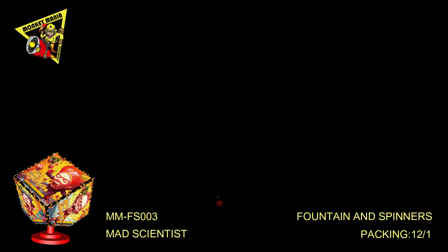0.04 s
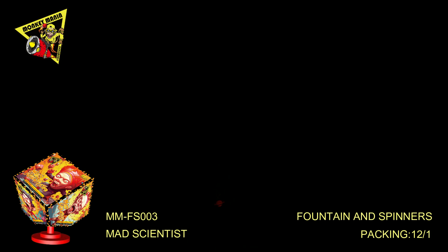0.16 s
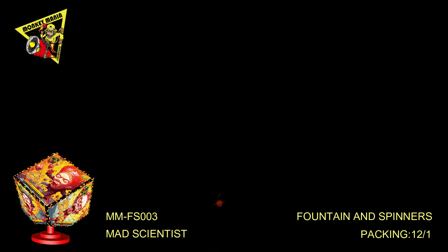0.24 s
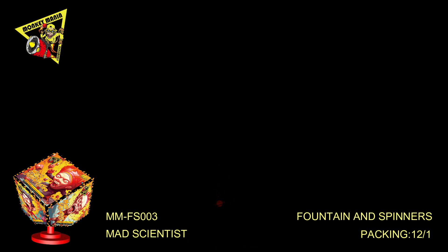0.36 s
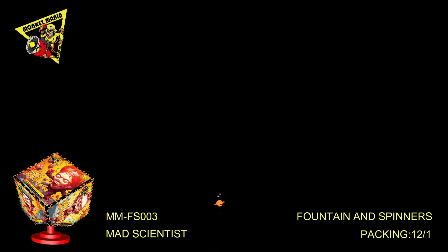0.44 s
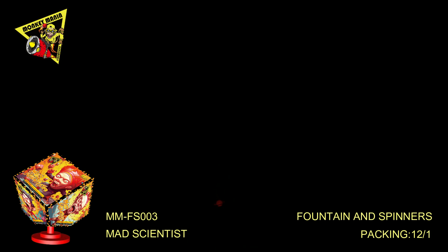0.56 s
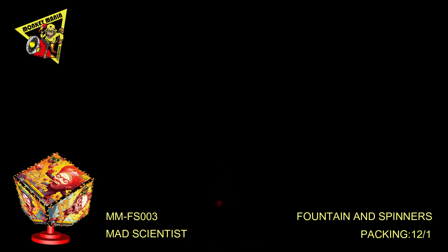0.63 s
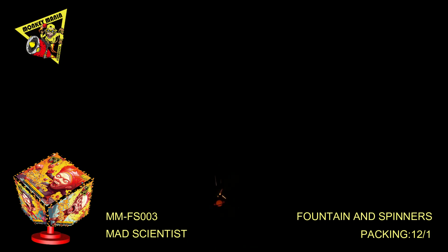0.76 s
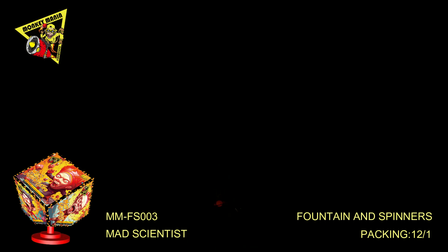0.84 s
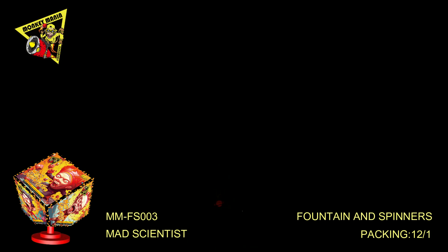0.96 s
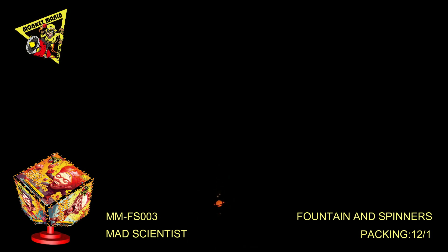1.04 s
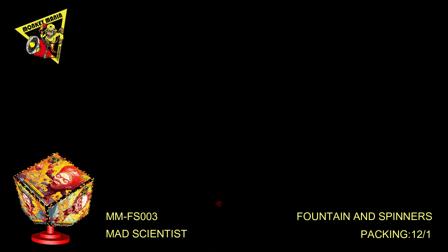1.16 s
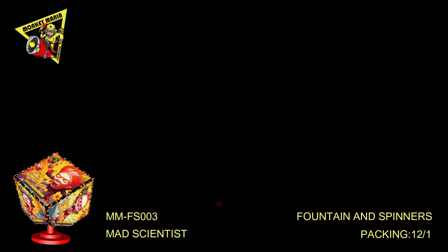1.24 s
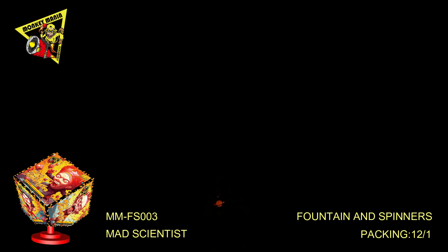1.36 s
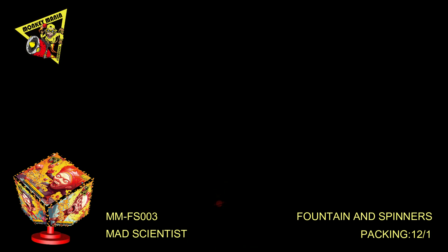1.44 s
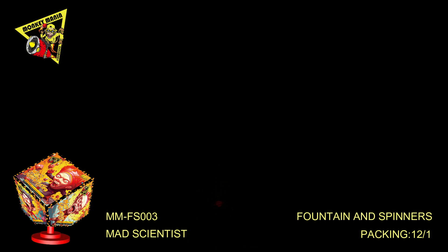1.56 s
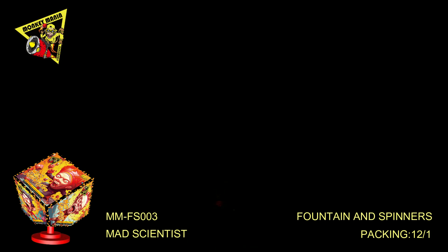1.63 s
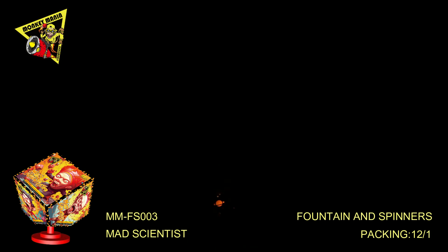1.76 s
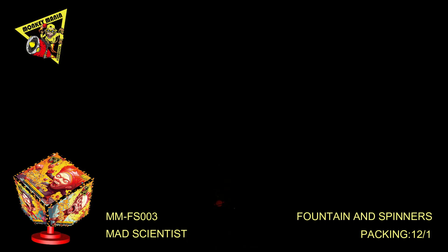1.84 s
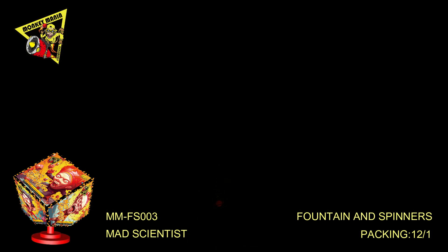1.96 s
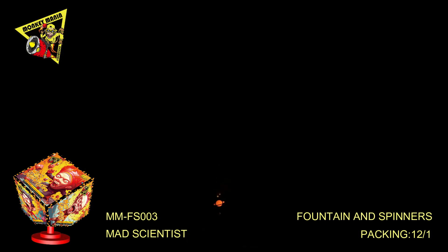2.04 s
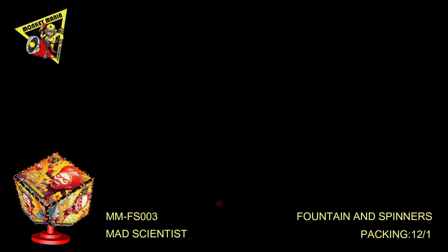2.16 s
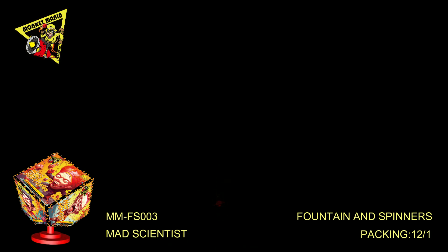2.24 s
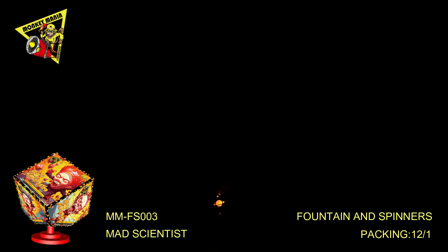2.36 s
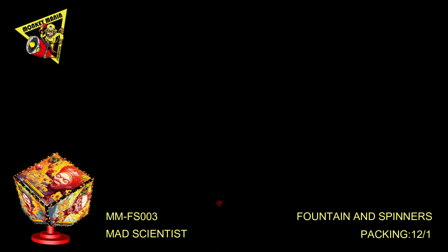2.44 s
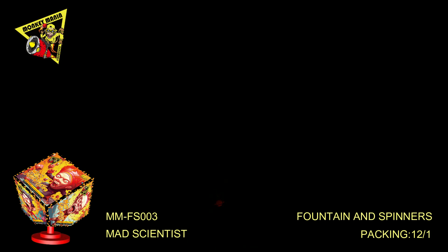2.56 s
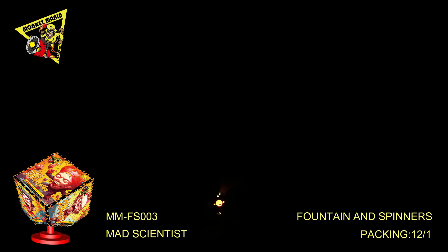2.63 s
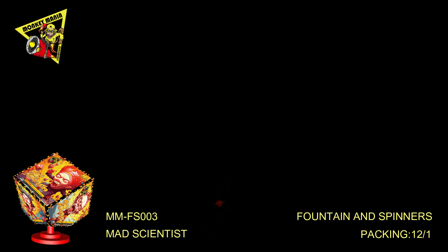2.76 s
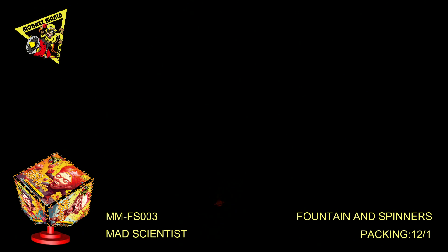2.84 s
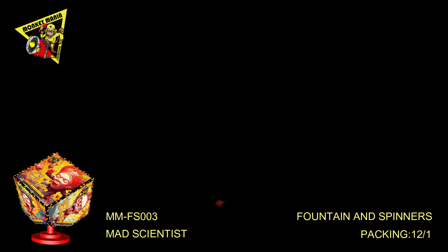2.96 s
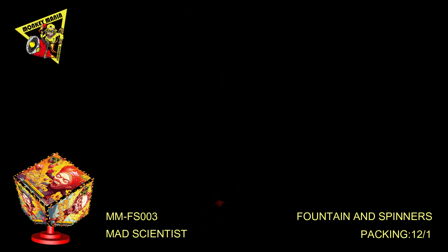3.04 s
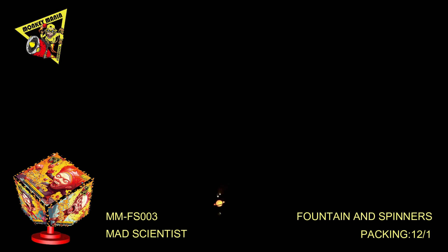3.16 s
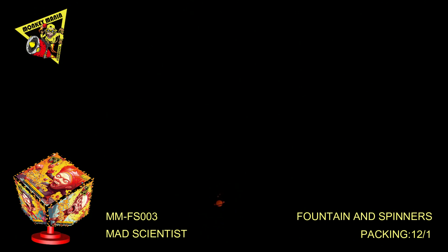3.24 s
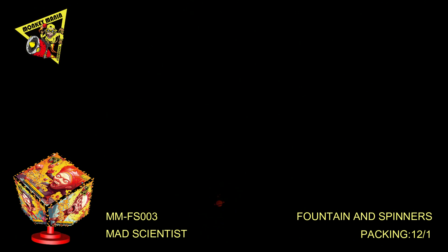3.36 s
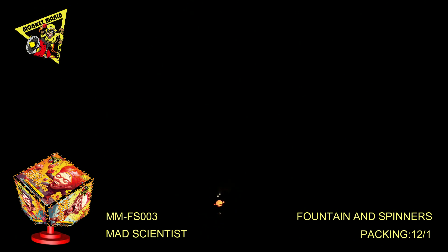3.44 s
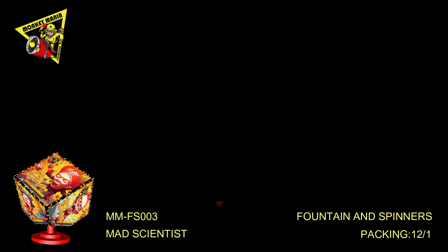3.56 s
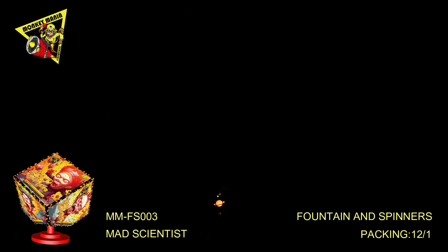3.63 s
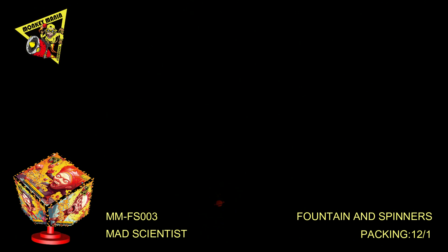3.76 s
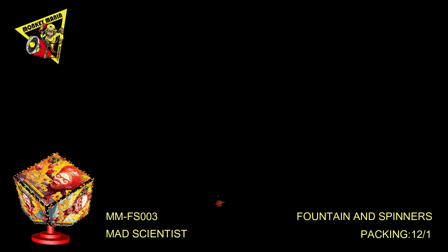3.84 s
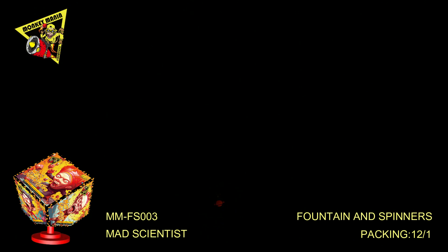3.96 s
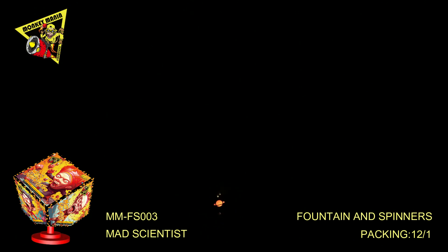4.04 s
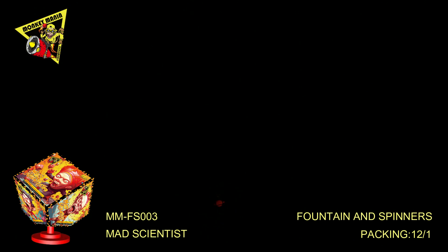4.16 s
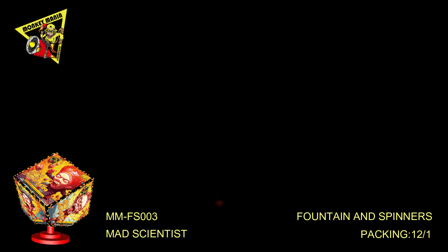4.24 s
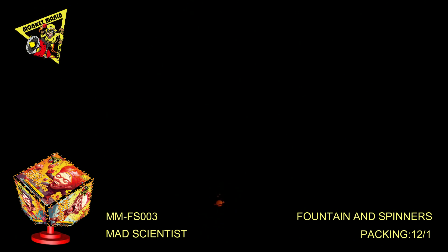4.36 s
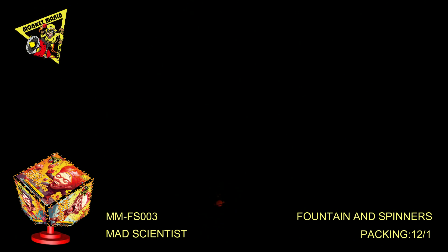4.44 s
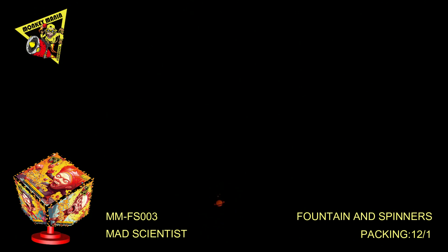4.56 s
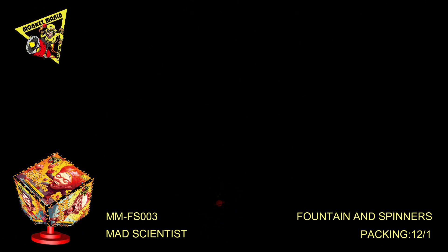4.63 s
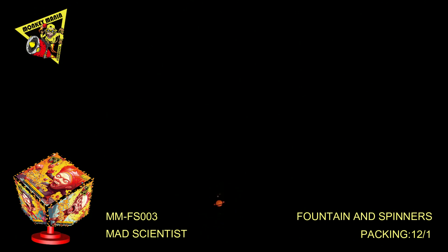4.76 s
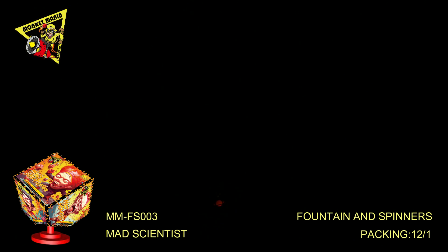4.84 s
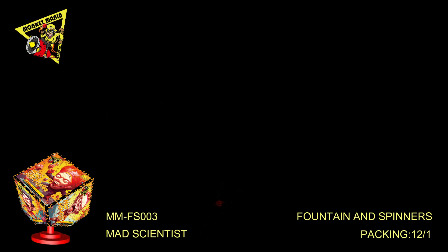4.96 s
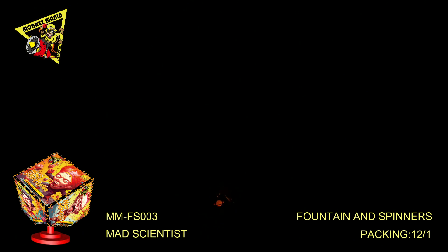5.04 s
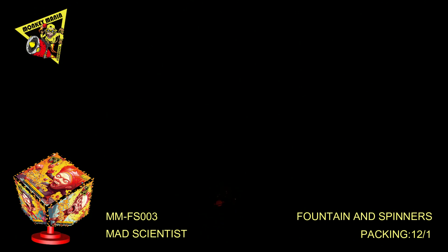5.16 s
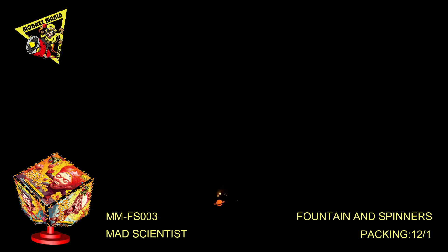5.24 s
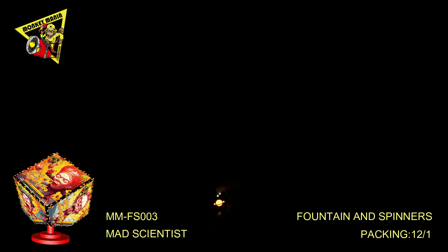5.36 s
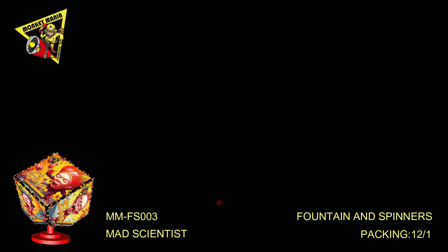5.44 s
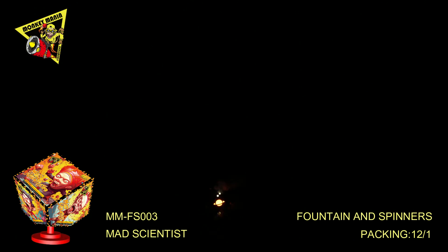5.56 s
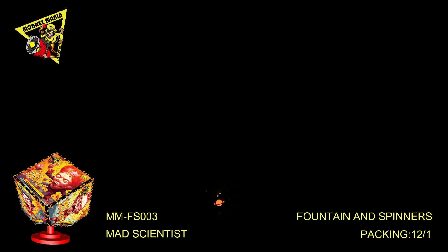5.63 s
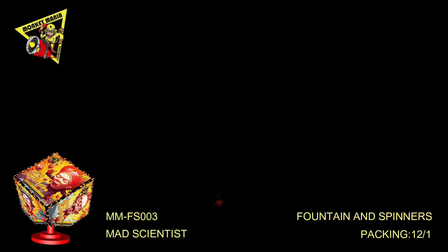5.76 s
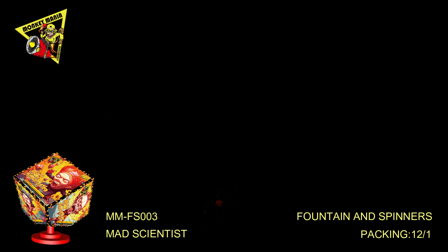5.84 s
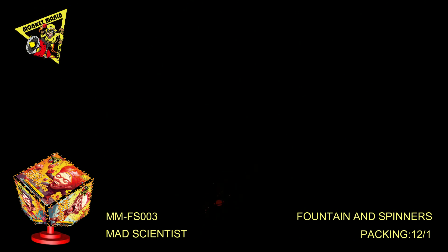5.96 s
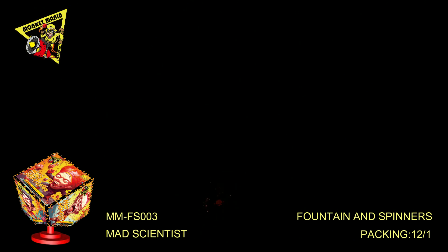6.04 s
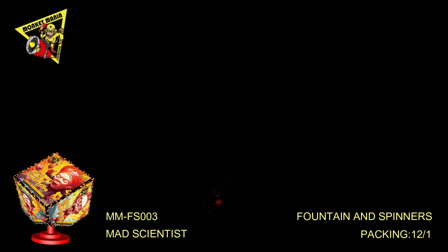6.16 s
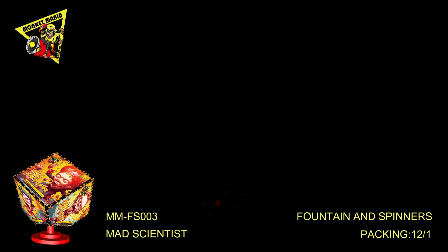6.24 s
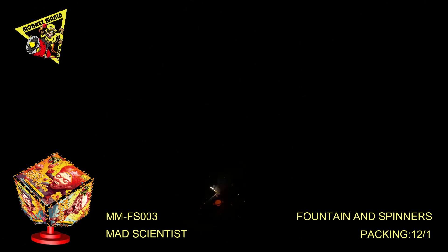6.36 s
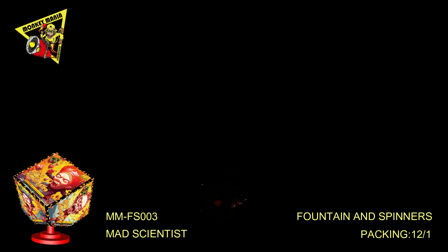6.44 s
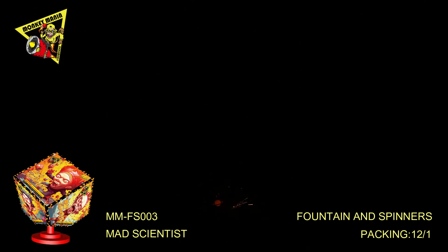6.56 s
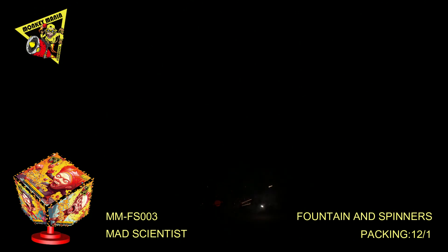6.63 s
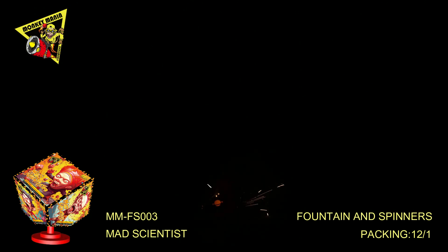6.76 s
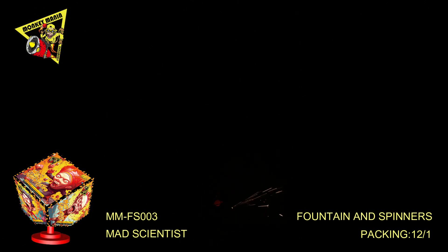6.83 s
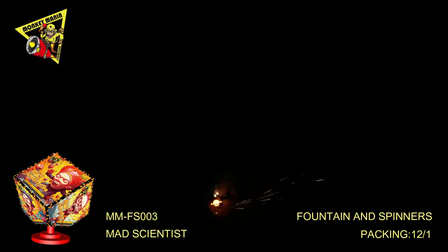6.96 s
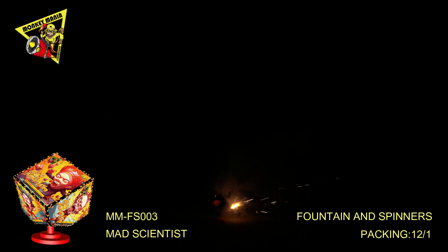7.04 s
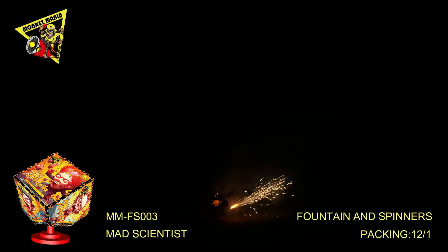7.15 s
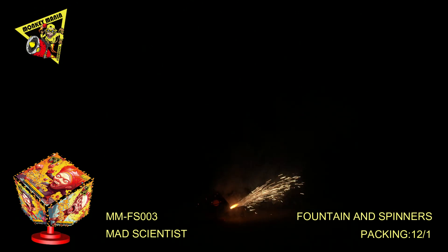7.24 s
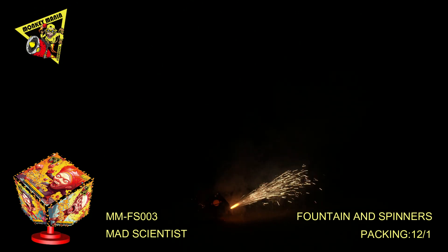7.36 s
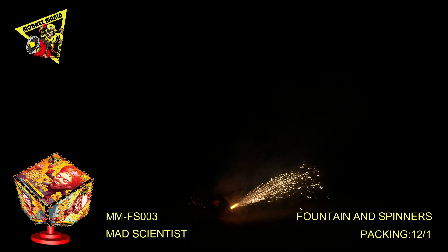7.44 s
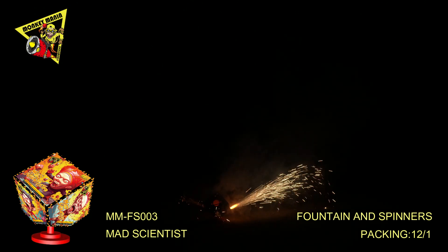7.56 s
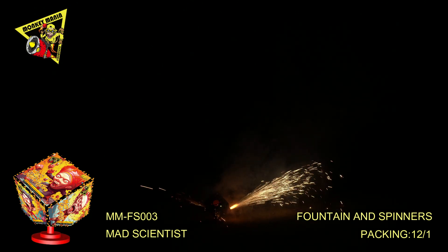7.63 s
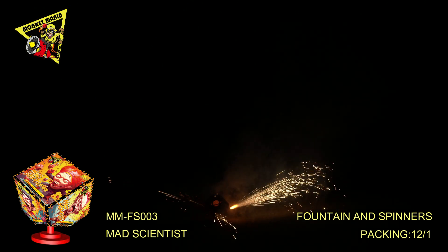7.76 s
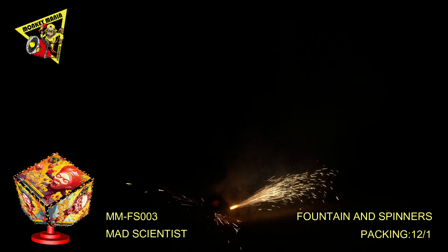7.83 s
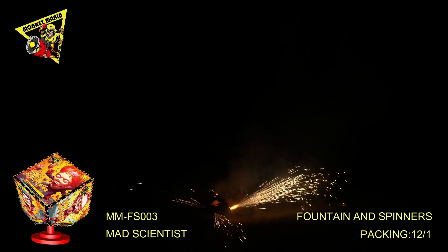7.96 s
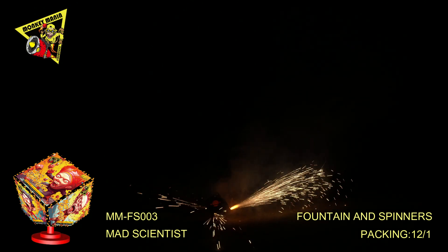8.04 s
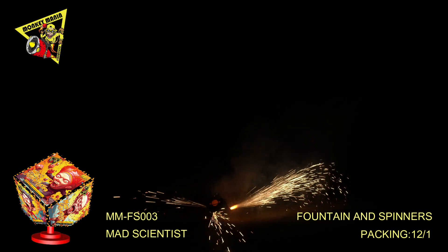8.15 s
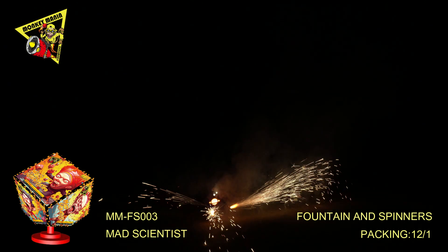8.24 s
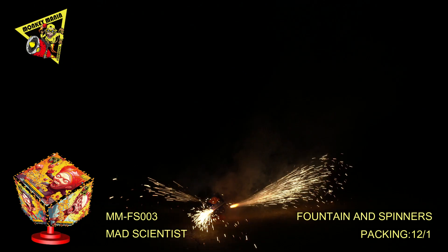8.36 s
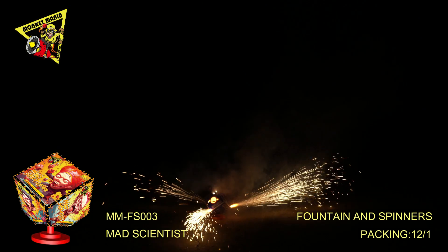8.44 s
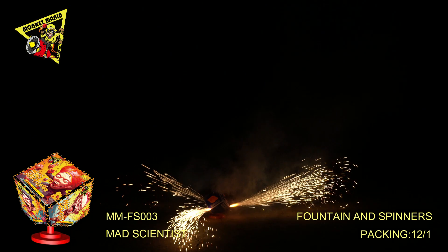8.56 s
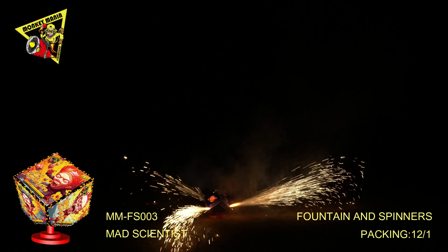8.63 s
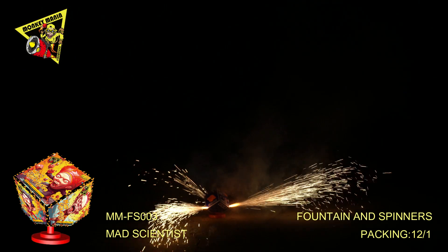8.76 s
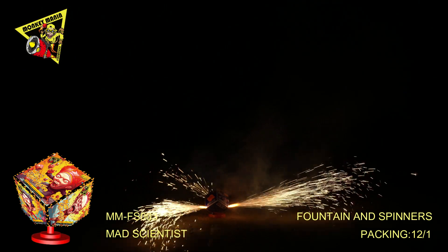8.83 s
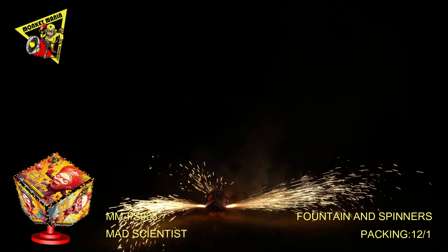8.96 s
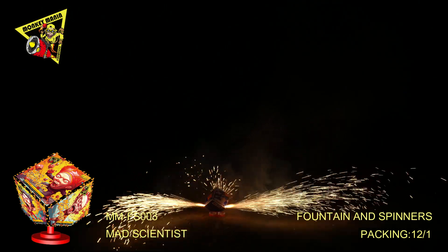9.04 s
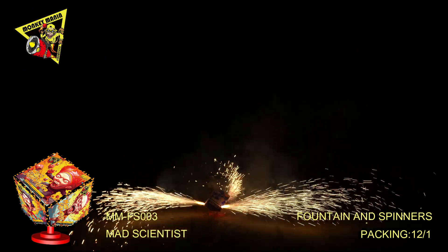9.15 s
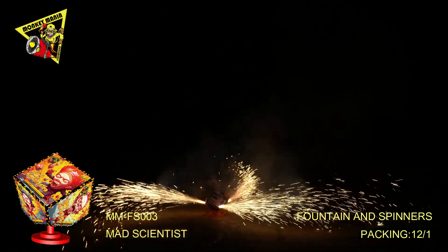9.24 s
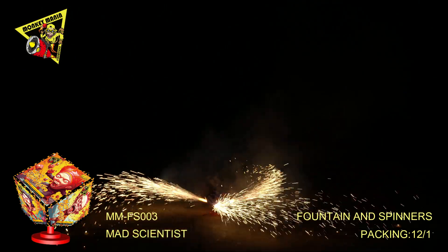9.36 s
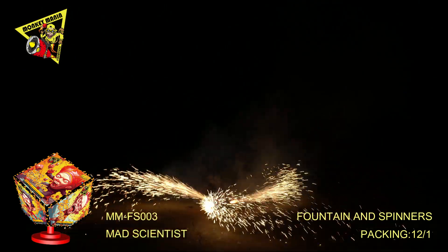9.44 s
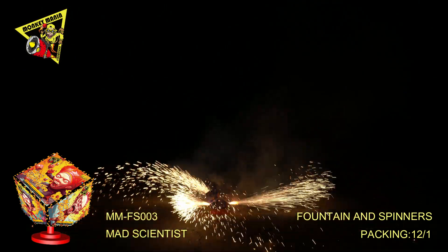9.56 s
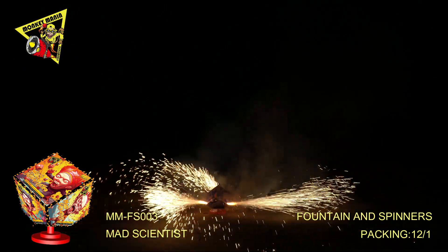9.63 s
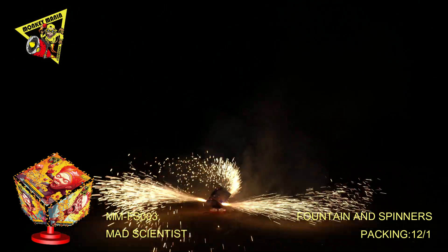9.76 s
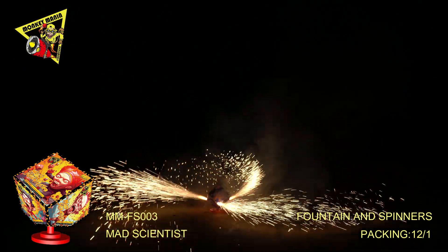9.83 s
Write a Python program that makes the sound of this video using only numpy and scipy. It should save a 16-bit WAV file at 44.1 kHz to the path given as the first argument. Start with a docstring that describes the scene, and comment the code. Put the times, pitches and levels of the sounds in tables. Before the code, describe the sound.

Night, open air, with a shrill insect chorus around 6 kHz all round, slightly stronger right, plus faint air hiss and distant rumble. From 0 s a small flame hisses very quietly, giving soft hollow puffs with a little fizz about every 0.3 s; at 0.7 s it spits with a brief crackle. A nearer insect trills in short bouts, around 0.5-1, 2.3-2.9 and 5-6 s; a very faint cricket chirps from 2.7 to 5.5 s. At 6.4 s a fuse fizzes up, sputtering, with small dull knocks, and is muffled at 7.08 s. At 7.12 s the first jet catches with a soft thump and rushing roar; sparks sizzle from 7.6 s. A stronger jet thumps in at 8.27 s, its hiss gliding down. A dull crack hits at 8.76 s, a third jet joins at 8.95 s, and the roar continues with surges and crackling spark showers to about 9.9 s, cutting off still burning.

```python
"""Open ground at night, insects shrilling all round: a spinner fountain burns on the ground, mostly to the right.
First a small flame hisses through its tube's resonances, puffs at every flash and spits once.
A fuse of fluttering, crackling gas noise fizzes up and is muffled as it dives into the casing.
The drivers then catch one after another and roar, with soft thumps among them, spraying crackling sparks.
The ground's echo hollows out a few bands; a cricket, rumble and faint hiss lie behind."""
import sys
import numpy as np
from scipy import signal
from scipy.fft import rfft, irfft, next_fast_len
from scipy.io import wavfile
from scipy.ndimage import map_coordinates

SR = 44100
rng = np.random.default_rng(int(sys.argv[2]) if len(sys.argv) > 2 else 0)


def store_pcm(level_fs):
    """Save levels as 16-bit WAV."""
    pcm = np.round(np.clip(level_fs, -1, 1) * 32767).astype(np.int16)
    wavfile.write(sys.argv[1], SR, np.atleast_2d(pcm).T)


N = 436149

# Source levels are those before the ground's echo and the microphone.
# All spectra are relative, since the noise they shape is brought to rms 1.

# Drivers that catch and burn on. Each row: start in seconds, roar level in dB, rise in seconds.
DRIVER_STARTS = [(7.117, -34, .001), (8.27, -29, 0.019), (8.95, -31.5, .03)]
# Surges of the jets. Each row: centre in seconds, half length in seconds, then boosts in dB
# of the roar, of the nozzle and of the gas hiss.
JET_SURGES = [(7.17, .08, 2.5, -1, 0), (7.86, 0.13, 1.8, 6.5, 1.5), (8.2, .1, 1.6, 7, 0),
              (8.52, 0.14, 2, 5.5, 0), (9.01, 0.056, 0, -0.5, 6.5), (9.18, .06, 2.5, 3, 8),
              (9.64, .15, 1.5, 6, 6), (9.83, 0.083, 1, 11, 3.5)]
# Spectrum of the roar. Each row: frequency in Hz, level in dB per Hz.
ROAR_SPECTRUM = [(25, -51), (80, -36), (160, -28), (280, -12.5), (450, -7), (650, 2), (1000, 2.5),
                 (1600, 1), (2500, -3), (3200, -10), (4200, -21), (9000, -39), (15500, -33)]
# Spectrum of the nozzle resonance. Each row: frequency in Hz, level in dB per Hz.
NOZZLE_SPECTRUM = [(100, -60), (1500, -48), (2600, -12), (3300, 2), (4100, 6), (4700, 3), (6000, -22),
                   (10000, -47)]
# Spectrum of the gas hiss. Each row: frequency in Hz, level in dB per Hz.
GAS_SPECTRUM = [(300, -60), (3500, -27), (4400, -6), (4800, 1.5), (5600, 1.5), (6400, 0), (7100, -3),
                (8200, -14), (12000, -42)]
IGNITION_S, BUILD_DB_PER_S = 7.118, 2  # each driver roars louder as its pressure builds
# Levels at the first driver's thrust, and dB gained per dB of thrust
NOZZLE_DB, NOZZLE_FOLLOWS, GAS_DB, GAS_FOLLOWS = -53, 1.88, -43.8, 0.86
# The second jet's hiss falls in pitch as its nozzle burns wider, then settles
SWEEP_START_S, SWEEP_RISE_S, SWEEP_DB = 8.3, .04, -38
SWEEP_FROM_HZ, SWEEP_FALL_HZ_PER_S, SWEEP_TO_HZ = 6900, 5500, 4740
SWEEP_HALF_WIDTH_HZ = 450  # to 6 dB down

# Showers of sparks. Each row: start in seconds, length in seconds, sizzle level in dB before it thins out.
SPARK_SHOWERS = [(7.4, 0.28, -44), (7.63, 0.65, -28), (8.947, 0.56, -35), (9.46, 0.57, -36.5),
                 (9.73, 0.18, -29)]
# Spectrum of the sizzle. Each row: frequency in Hz, level in dB per Hz.
SPARK_SPECTRUM = [(300, -60), (4500, -25), (6000, -2), (7000, -1), (8200, 2), (9500, -6.5), (10600, -10.5),
                  (13000, -39)]
# The finest sparks, the top treble. Each row: time in seconds, level in dB before a 4 dB lift.
SPRAY_LEVELS = [(7.2, -60.5), (7.57, -53.5), (7.7, -39.5), (7.97, -47), (8.24, -40.5), (8.74, -48.5),
                (9.06, -44.5), (9.13, -53), (9.54, -51.5), (9.77, -40.5), (9.87, -45)]
# Spectrum of the finest sparks. Each row: frequency in Hz, level in dB per Hz.
SPRAY_SPECTRUM = [(7000, -26), (9500, 3), (10500, -1.5), (13000, -3.5), (14700, -9), (16000, -9)]
# A shower flares up, thins out and ends, over a faint steady sizzle
SHOWER_ATTACK_S, SHOWER_SAG_DB_PER_S, SHOWER_RELEASE_S, SIZZLE_DB = 0.061, 8.5, 0.093, -50.5

# Soft low thumps among the jets. Each row: time in seconds, level in dB before a 1.5 dB cut,
# 60 dB decay in seconds.
LOW_THUMPS = [(7.118, -34, 0.17), (8.263, -27, 0.18), (8.279, -32, 0.13), (9.124, -32.5, 0.09)]
# Short dull cracks and knocks. Each row: start in seconds, peak in dB, pitch in Hz.
DULL_CRACKS = [(0.697, -35, 2420), (0.725, -42, 2170), (0.777, -41.5, 2140), (4.335, -45, 1500),
               (4.351, -43, 1240), (5.254, -44, 2520), (6.155, -38, 1490), (6.816, -34.5, 1500),
               (6.925, -33, 1110), (6.962, -43, 2050), (7.09, -35.5, 923), (8.759, -15, 988)]
# Single sparks. Each row: start in seconds, peak in dB before the air dulls it.
SPARK_SNAPS = [(.699, -25), (.7215, -28), (7.3, -26), (7.797, -21)]
SNAP_TOP_HZ = 9000  # the air dulls a snap above this

# Sputters of the fuse. Each row: centre in seconds, half length in seconds, boost in dB.
FUSE_SPUTTERS = [(6.56, 0.075, 4.5), (6.68, .015, 6), (6.76, .025, 7), (6.98, 0.087, 8)]
# Spectrum of the fuse. Each row: frequency in Hz, level in dB per Hz.
FUSE_SPECTRUM = [(300, -58), (3000, -22), (4300, -15), (4800, -2.5), (6200, -1), (8200, -5.5), (9600, -7),
                 (11500, -20.5), (13000, -22), (14800, -14), (16000, -18)]
# Spectrum of the smouldering casing. Each row: frequency in Hz, level in dB per Hz.
SMOULDER_SPECTRUM = [(300, -20), (600, -4.5), (1100, -2), (1900, -2), (2600, 3), (3400, -6.5), (4500, -3.5),
                     (8000, -14.5)]
# The fuse fizzes ever louder, until the casing muffles it
FUSE_START_S, FUSE_RISE_S, FUSE_END_S = 6.382, 0.029, 7.076
FUSE_DB, FUSE_GROWS_DB_PER_S, MUFFLE_DB = -50, 22, -15.5
# The casing smoulders faintly at first, and more once the fuse is alight
SMOULDER_START_S, SMOULDER_DB, SMOULDER_LIT_DB = 5.1, -59.5, -51.5

# Resonances of the flame's tube. Each row: centre in Hz, width in Hz, level in dB.
TUBE_MODES = [(503, 145, 2), (1530, 164, 0.5), (2600, 460, -15.5), (4010, 450, -7.5)]
# Flashes of the flame. Each row: time in seconds, puff level in dB.
FLAME_FLASHES = [(0.024, -52), (0.293, -48), (0.544, -52), (0.813, -51), (1.087, -46.5), (1.412, -49.5),
                 (1.812, -53.5), (2.107, -51), (2.415, -50), (2.734, -54), (2.985, -55), (3.262, -56),
                 (3.518, -59), (3.742, -56), (3.954, -60), (4.141, -54.5), (4.412, -53.5), (4.624, -53.5),
                 (4.884, -59), (5.099, -51.5), (5.307, -47), (5.462, -49.5), (5.658, -46.5), (5.754, -49),
                 (5.956, -49.5), (6.185, -45), (6.395, -47.5), (6.588, -47), (6.804, -50.5), (7.046, -44.5)]
# Spectrum of a puff. Each row: frequency in Hz, level in dB per Hz.
PUFF_SPECTRUM = [(50, -44), (150, -33), (300, -8.5), (400, -13), (480, 1.5), (580, -5), (700, -12),
                 (1000, -25), (1550, -12), (2000, -35), (4000, -34.5)]
# Spectrum of a flash's fizz. Each row: frequency in Hz, level in dB per Hz.
FIZZ_SPECTRUM = [(100, -40), (1000, -4), (3300, -4.5), (4100, 8.5), (5000, -10), (6500, 2), (8000, 0),
                 (9300, 1), (12000, -14), (16000, -5.5)]
# Spurts within the spit. Each row: centre in seconds, half length in seconds, boost in dB.
SPIT_SPURTS = [(.696, .012, 2.5), (.724, .006, 4)]
# Spectrum of the spit. Each row: frequency in Hz, level in dB per Hz.
SPIT_SPECTRUM = [(100, -36), (300, -15), (700, 8), (1300, -6), (2600, 2.5), (3500, -11), (4500, 6.5),
                 (8000, 0.5), (16000, -20)]
# The flame burns down slowly and sinks once
FLAME_DB, FLAME_SAG_DB_PER_S, FLAME_SINKS_S, FLAME_SINK_DB = -57, 0.7, 3.93, 3.5
# The spit is a short rush of gas
SPIT_START_S, SPIT_HOLD_S, SPIT_RELEASE_S, SPIT_DB = .683, 0.064, .012, -41.5
# Fizz of an average flash, and the dB it gains per dB of puff
FIZZ_DB, FIZZ_FOLLOWS = -52.5, 0.13

# Bands the ground's echo cancels. Each row: centre in Hz, width in Hz, depth from 0 to 1.
GROUND_NOTCHES = [(374.6, 86, 0.76), (829, 156, 1), (1302, 143, 0.37), (1844, 230, 0.26)]
# Echoes of nearby things. Each row: delay in seconds, strength (negative is inverted).
SIDE_ECHOES = [(.0009, 0.074), (.00172, -0.4), (.0043, .5), (.0068, 0.37)]
# Side echoes against the direct sound. Each row: frequency in Hz, level in dB before each echo's strength.
ECHO_SPECTRUM = [(100, -26), (500, -26), (1000, -25), (2000, -12), (4000, -13.5), (8000, -6), (16000, -16)]
# How the firework leans in the stereo image. Each row: frequency in Hz, left minus right in dB.
STEREO_LEAN = [(300, -1), (1000, 0.4), (2400, -4), (4400, 0.5), (8000, -3.5), (15000, 0)]

# Bouts of one nearer insect. Each row: start in seconds, end in seconds, level in dB.
TRILL_BOUTS = [(0.483, 0.952, -57.5), (2.3, 2.89, -60), (4.95, 5.3, -62), (5.62, 5.99, -61)]
# Spectrum of the nearer insect. Each row: frequency in Hz, level in dB per Hz.
TRILL_SPECTRUM = [(4800, -37), (5450, -3), (5900, 0), (6400, -6), (7200, -31)]
# Spectrum of the chorus. Each row: frequency in Hz, level in dB per Hz.
CHORUS_SPECTRUM = [(4000, -39), (5500, -22), (6100, -2), (6600, 0), (7300, -3), (8000, -15.5), (9500, -15),
                   (12000, -25)]
# Spectrum of the high buzz. Each row: frequency in Hz, level in dB per Hz.
BUZZ_SPECTRUM = [(6500, -30), (8500, -5), (9700, 1), (11000, -11), (14000, -8), (16000, -14)]
CHORUS_DB, CHORUS_WAVER_DB = -54.5, 1.35
BUZZ_START_S, BUZZ_END_S, BUZZ_DB = 2.9, 4.44, -67
# The faint cricket: a chirp is a few wing strokes, each falling in pitch
CRICKET_START_S, CRICKET_END_S, CRICKET_DB = 2.65, 5.5, -73
CHIRP_EVERY_S, CHIRP_LENGTH_S, STROKES_PER_S = .249, .095, 35
STROKE_HZ, STROKE_FALL_HZ = 4700, 800

# Slow swells of the distant rumble. Each row: centre in seconds, half length in seconds, boost in dB.
FAR_SWELLS = [(1.3, 0.36, 6), (4.78, 0.22, 7), (5.4, 0.39, 3.5), (6.8, .25, 4.5)]
# Spectrum of the distant rumble. Each row: frequency in Hz, level in dB per Hz.
RUMBLE_SPECTRUM = [(12, -67), (20, -37), (75, -21), (125, -1.5), (146, 2), (172, 0.5), (222, -8.5),
                   (290, 2.5), (370, -10.5), (420, -4.5), (550, -21), (920, -120)]
# Spectrum of the faint hiss. Each row: frequency in Hz, level in dB per Hz.
AIR_SPECTRUM = [(40, -40), (150, -24), (300, -8.5), (500, -4), (800, -1), (1150, 2), (2000, -2.5),
                (3400, -1), (5000, -0.5), (10000, -13), (12000, -13), (16000, -22)]
RUMBLE_DB, AIR_DB = -69, -62.5
TOP_HZ = 15850  # band limit of the camera


def drivers():
    """The jets roar and hiss, brighter with more thrust; one uneven burn shakes all of their sound."""
    roar_db = thrust()
    gained_db = roar_db - DRIVER_STARTS[0][1]
    roar_surge, nozzle_surge, gas_surge = swells(JET_SURGES)
    nozzle_db = NOZZLE_DB + NOZZLE_FOLLOWS * gained_db + nozzle_surge
    gas_db = GAS_DB + GAS_FOLLOWS * gained_db + gas_surge
    spray_db = curves(SPRAY_LEVELS)[0] + 4
    roar = amp(roar_db + roar_surge) * burning(ROAR_SPECTRUM, rate=500, crackle_db=-15, flutter_db=0.6)
    nozzle = amp(nozzle_db) * burning(NOZZLE_SPECTRUM, rate=250, crackle_db=-8.5, flutter_db=1.1)
    gas = amp(gas_db) * burning(GAS_SPECTRUM, rate=400, crackle_db=-15, flutter_db=1.1)
    sparks = showers() * burning(SPARK_SPECTRUM, rate=710, crackle_db=-17, flutter_db=0.9)
    spray = amp(spray_db) * burning(SPRAY_SPECTRUM, rate=320, crackle_db=-21, flutter_db=1.0)
    shake = amp(0.32 * wobble(28) + 0.51 * wobble(140))
    return (roar + nozzle + gas + sweep() + sparks + spray) * shake * after(IGNITION_S, .001)


def thrust():
    """The joint roar in dB of all drivers that have caught, each building up from its own start."""
    power = 0
    for s, db, rise in DRIVER_STARTS:
        roar = amp(db + BUILD_DB_PER_S * (clock() - s)) * after(s, rise)
        power = power + roar ** 2
    return 10 * np.log10(power + 1e-20)


def sweep():
    """A narrow band of hiss that glides down once the second jet is alight."""
    fall_hz = SWEEP_FALL_HZ_PER_S * np.maximum(clock() - SWEEP_START_S, 0)
    centre_hz = np.maximum(SWEEP_FROM_HZ - fall_hz, SWEEP_TO_HZ)
    phase = 2 * np.pi * np.cumsum(centre_hz) / SR
    # two slow noises on a cosine and a sine carrier make a band around the moving centre
    a, b = filtered(rng.standard_normal((2, N)), lambda f: 1 / (1 + (f / SWEEP_HALF_WIDTH_HZ) ** 2))
    band = unit(a * np.cos(phase) + b * np.sin(phase))
    return amp(SWEEP_DB) * after(SWEEP_START_S, SWEEP_RISE_S) * band


def showers():
    """The strength of the sparks' sizzle: showers over a faint steady stream, summed as power."""
    power = amp(SIZZLE_DB) ** 2
    for s, length, db in SPARK_SHOWERS:
        flare = after(s, SHOWER_ATTACK_S) * (1 - after(s + length, SHOWER_RELEASE_S))
        level_db = db - SHOWER_SAG_DB_PER_S * np.maximum(clock() - s, 0)
        power = power + (amp(level_db) * flare) ** 2
    return np.sqrt(power)


def thumps():
    """A low, soft thump of gas: noise that starts sharply and dies away."""
    push = 0
    for s, db, t60 in LOW_THUMPS:
        push = push + amp(db - 1.5 - 60 * np.abs(clock() - s) / t60) * after(s, 0.0022)
    return push * noise([(30, -35), (110, -14), (260, 5.5), (700, 11.0), (2000, -20), (6000, -45)])


def cracks():
    """Short, dull cracks and knocks: decaying noise through a broad resonance."""
    out, t = np.zeros(N + SR), np.arange(SR // 8) / SR
    f = np.fft.rfftfreq(len(t), 1 / SR)
    for s, db, hz in DULL_CRACKS:
        burst = rng.standard_normal(len(t)) * amp(-60 * t / 0.042)
        crack = irfft(rfft(burst) * resonance(f, hz, 1.2 * hz) ** 2, len(t))
        out[round(s * SR):][:len(t)] += amp(db) * crack / np.abs(crack).max()
    return out[:N]


def snaps():
    """A single spark bursts in about a millisecond."""
    out, t = np.zeros(N), np.arange(SR // 100) / SR
    for s, db in SPARK_SNAPS:
        snap = rng.standard_normal(len(t)) * amp(-60 * t / 0.00092)
        out[round(s * SR):][:len(t)] += amp(db) * snap / np.abs(snap).max()
    return filtered(out, lambda f: 1 / (1 + (f / SNAP_TOP_HZ) ** 2))


def fuse():
    """The fuse fizzes ever louder and sputters, then is muffled at once as it enters the casing."""
    age = np.minimum(clock(), FUSE_END_S) - FUSE_START_S
    muffle_db = MUFFLE_DB * after(FUSE_END_S, .004)
    level_db = FUSE_DB + FUSE_GROWS_DB_PER_S * age + swells(FUSE_SPUTTERS)[0] + muffle_db
    fizz = burning(FUSE_SPECTRUM, rate=980, crackle_db=-18, flutter_db=0.94)
    fizz = amp(level_db) * after(FUSE_START_S, FUSE_RISE_S) * fizz
    heat = amp(SMOULDER_DB) * after(SMOULDER_START_S, 0.13)
    heat = heat + amp(SMOULDER_LIT_DB) * after(FUSE_START_S + 0.052, 0.19)
    smoulder = heat * burning(SMOULDER_SPECTRUM, rate=300, crackle_db=-11.5, flutter_db=1.3)
    return (fizz + smoulder) * (1 - after(IGNITION_S, 0.013))


def flame():
    """The small flame blows across its tube's resonances and spits once."""
    modes = lambda f: sum(amp(db) * resonance(f, hz, width) for hz, width, db in TUBE_MODES)
    level_db = FLAME_DB - FLAME_SAG_DB_PER_S * clock() - FLAME_SINK_DB * after(FLAME_SINKS_S, .08)
    tube = amp(level_db) * unit(filtered(rng.standard_normal(N), modes))
    spit = burning(SPIT_SPECTRUM, rate=750, crackle_db=-6.0, flutter_db=3.5)
    spit = amp(SPIT_DB + swells(SPIT_SPURTS)[0]) * spit
    spitting = after(SPIT_START_S, .002) * (1 - after(SPIT_START_S + SPIT_HOLD_S, SPIT_RELEASE_S))
    return tube * (1 - after(IGNITION_S, .1)) + spit * spitting


def flashes():
    """Each flash is a short rush of gas: the tube's lowest resonance puffs, with a fizz on top."""
    puff, fizz, t = np.zeros(N), np.zeros(N), clock()
    average_db = np.mean([db for s, db in FLAME_FLASHES])
    for s, db in FLAME_FLASHES:
        half = np.interp(s, [4.4, 5.3], [.016, .009])  # half length (s): the flashes grow brisker
        rush = 1 / (1 + .5 * ((t - s - .003) / half) ** 2) ** 2
        puff += amp(db) * rush
        fizz += amp(FIZZ_DB + FIZZ_FOLLOWS * (db - average_db)) * rush
    return puff * noise(PUFF_SPECTRUM) + fizz * burning(FIZZ_SPECTRUM, rate=900, crackle_db=-4, flutter_db=0.0)


def ground(x):
    """The ground's echo cancels a few low bands and ripples the treble; nearby things echo from the sides."""
    def hollow(f):
        cuts = [1 - np.clip(depth, 0, 1) * resonance(f, hz, width) for hz, width, depth in GROUND_NOTCHES]
        return np.prod(cuts, axis=0)

    ripple = lambda f: 1 + 0.044 * f / (f + 1500) * np.exp(-2j * np.pi * f * .00182)
    direct = filtered(x, lambda f: hollow(f) * ripple(f))
    echoes = lambda f: sum(gain * np.exp(-2j * np.pi * f * delay) for delay, gain in SIDE_ECHOES)
    side = filtered(direct, lambda f: amp(along(ECHO_SPECTRUM, f)) * echoes(f))
    # a dense short tail and a fainter longer one, independent left and right
    t = np.arange(SR // 5) / SR
    tails = rng.standard_normal((2, len(t))) * (amp(-60 * t / .035) + amp(-27 - 60 * t / .2))
    field = signal.fftconvolve(direct[None], tails / np.linalg.norm(tails[0]), axes=1)[:, :N]
    # rough ground scatters mainly the short waves
    rough = filtered(field, lambda f: amp(-6.5) * f / np.hypot(f, 4000))
    return np.array([direct + side, direct - side]) + rough


def insects():
    """A shrill chorus all around, one nearer insect whose wing strokes pulse in bouts, and a brief high buzz."""
    chorus = amp(CHORUS_DB + CHORUS_WAVER_DB * wobble(4.01)) * wide(CHORUS_SPECTRUM, side_db=-2.0)
    bouts = sum(amp(db) * (after(start, 0.062) - after(end, .015)) for start, end, db in TRILL_BOUTS)
    strokes = amp(1.9 * np.sin(2 * np.pi * 57 * clock() + wobble(6.6)))  # 57 a second
    trill = bouts * strokes * wide(TRILL_SPECTRUM, side_db=-3)
    buzzing = after(BUZZ_START_S, .08) - after(BUZZ_END_S, .15)
    buzz = amp(BUZZ_DB) * buzzing * wide(BUZZ_SPECTRUM, side_db=-10)
    return (chorus + buzz + trill) * amp([[-1.3], [1.3]])  # stronger on the right


def cricket():
    """Loosely spaced chirps of a few wing strokes; each stroke glides down in pitch."""
    in_chirp = (clock() - CRICKET_START_S + .012 * wobble(6)) % CHIRP_EVERY_S
    stroke = (STROKES_PER_S * in_chirp) % 1
    # the wing sounds in the first half of each stroke
    gate = np.sin(np.pi * np.minimum(2 * stroke, 1)) ** 2 * (in_chirp < CHIRP_LENGTH_S)
    pitch_hz = STROKE_HZ - STROKE_FALL_HZ * stroke + 60 * wobble(30)
    tone = np.sin(2 * np.pi * np.cumsum(pitch_hz) / SR)
    singing = after(CRICKET_START_S, .01) - after(CRICKET_END_S, .01)
    return amp(CRICKET_DB) * singing * unit(gate * tone * amp(3 * wobble(12)))


def night():
    """Distant rumble that swells now and then, and a faint even hiss."""
    rumble = amp(RUMBLE_DB + swells(FAR_SWELLS)[0]) * wide(RUMBLE_SPECTRUM, side_db=-26)
    return rumble + amp(AIR_DB) * wide(AIR_SPECTRUM, side_db=2.0)


def burning(spectrum, rate, crackle_db, flutter_db):
    """Gas noise that flutters with the uneven burn, plus tiny grains that burst rate times a second."""
    gas = rng.standard_normal(N) * amp(flutter_db * (wobble(45) + wobble(260)))
    grains = (rng.random(N) < rate / SR) * rng.laplace(size=N)
    return coloured(unit(gas) + amp(crackle_db) * unit(grains), spectrum)


def wide(spectrum, side_db):
    """Smooth stereo noise that comes from all around."""
    mid, side = noise(spectrum), amp(side_db) * noise(spectrum)
    return np.array([mid + side, mid - side])


def noise(spectrum):
    """Smooth noise of rms 1."""
    return coloured(rng.standard_normal(N), spectrum)


def coloured(x, spectrum):
    """x given a spectrum, at rms 1."""
    return unit(filtered(x, lambda hz: amp(along(spectrum, hz))))


def resonance(f, hz, width):
    """A causal resonance of gain 1 at its centre."""
    return 1j * f * width / (hz * hz - f * f + 1j * f * width)


def filtered(x, response):
    """x times a complex response of frequency."""
    m = next_fast_len(N + SR // 4, True)
    return irfft(rfft(x, m) * response(np.fft.rfftfreq(m, 1 / SR)), m)[..., :N]


def swells(rows):
    """Bell-shaped boosts from (s, half length, dB, ..) rows: one curve in dB for each level column."""
    t = clock()
    return sum(np.outer(boosts, np.exp(-((t - s) / half) ** 2)) for s, half, *boosts in rows)


def wobble(rate):
    """A smooth random curve, rate knots a second."""
    return map_coordinates(rng.standard_normal(int(N * rate / SR) + 4), [clock() * rate], order=2)


def after(s, rise):
    """A soft step from 0 to 1, halfway at time s."""
    return .5 + .5 * np.tanh((clock() - s) / rise)


def curves(rows):
    """One value per sample for each column after the time."""
    s, *cols = np.transpose(rows)
    return [np.interp(clock(), s, c) for c in cols]


def along(points, hz):
    """Read (Hz, value) points on a log frequency axis."""
    f, v = np.transpose(points)
    return np.interp(np.log(hz + 1), np.log(f + 1), v)


def clock():
    """The time of every sample in seconds."""
    return np.arange(N) / SR


def unit(x):
    """Scale to rms 1."""
    return x / np.sqrt(np.mean(x ** 2) + 1e-20)


def amp(db):
    """Decibels to gain."""
    return 10 ** (np.asarray(db) / 20)


def scene():
    """The firework, leaning right in most bands, amid the sounds of the night."""
    firework = ground(flame() + flashes() + fuse() + drivers() + cracks() + snaps() + thumps())
    placed = filtered(firework, lambda hz: amp(np.outer([.5, -.5], along(STEREO_LEAN, hz))))
    return placed + insects() + cricket() + night()


def record(dry):
    """The camera's microphone thins the bass below about 70 Hz; nothing passes above the band limit."""
    return filtered(dry, lambda hz: hz / np.hypot(hz, 70) * (hz < TOP_HZ))


dry = scene()
out = record(dry)
store_pcm(out)
```